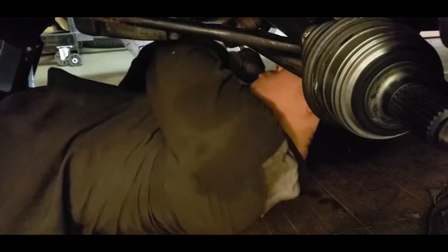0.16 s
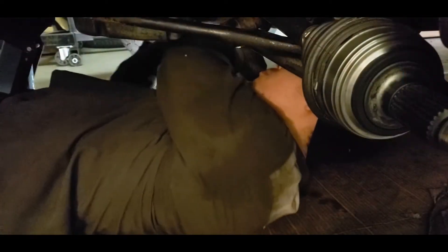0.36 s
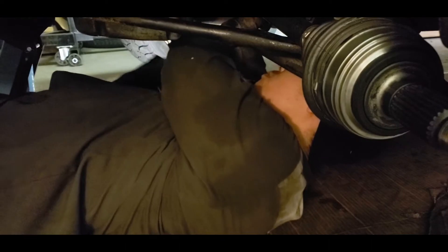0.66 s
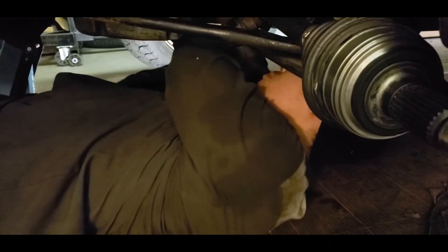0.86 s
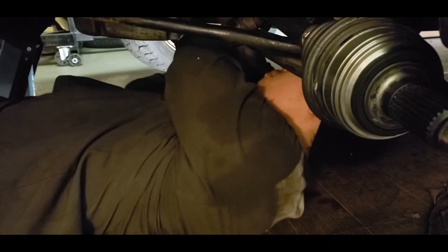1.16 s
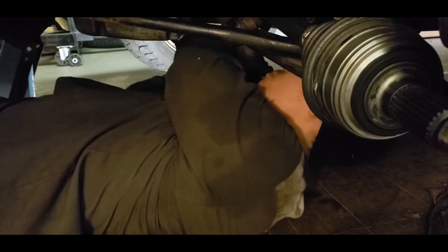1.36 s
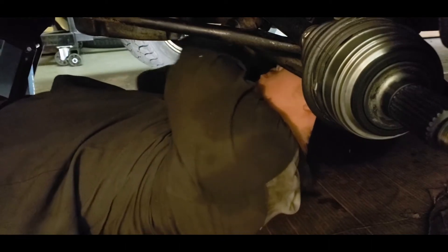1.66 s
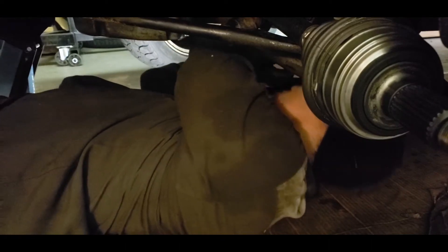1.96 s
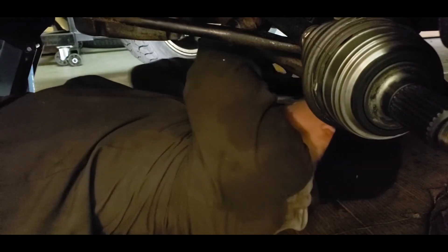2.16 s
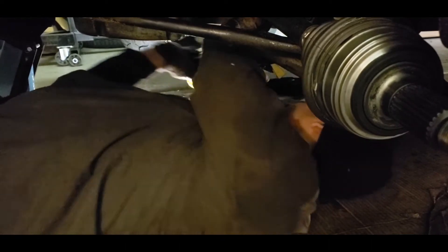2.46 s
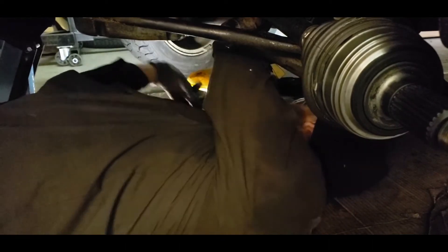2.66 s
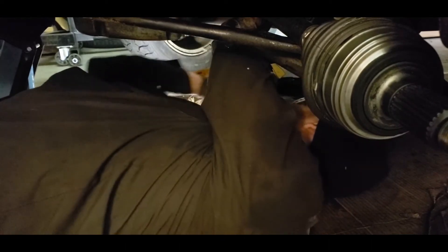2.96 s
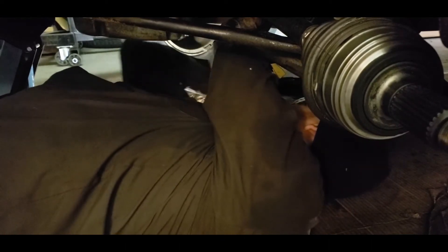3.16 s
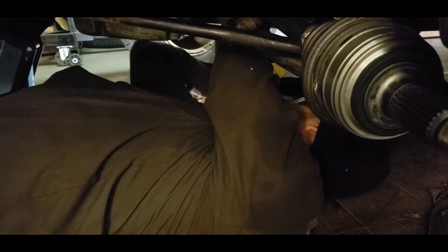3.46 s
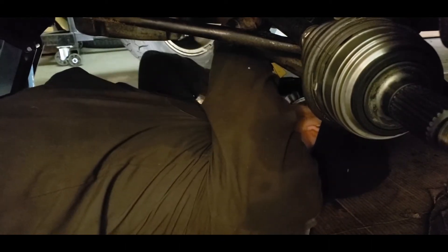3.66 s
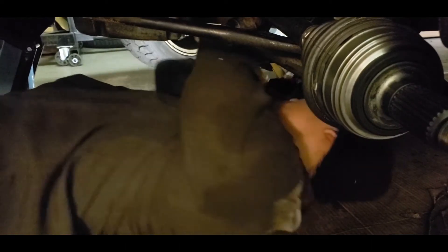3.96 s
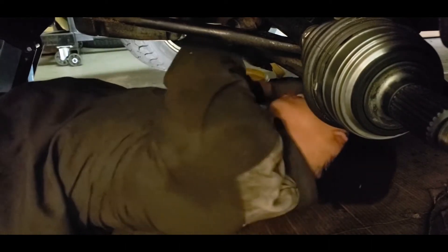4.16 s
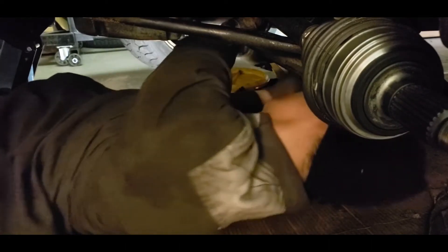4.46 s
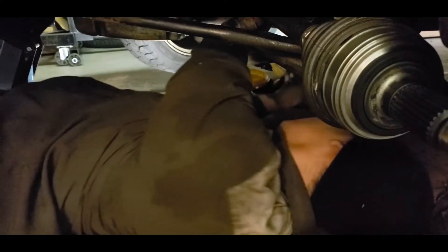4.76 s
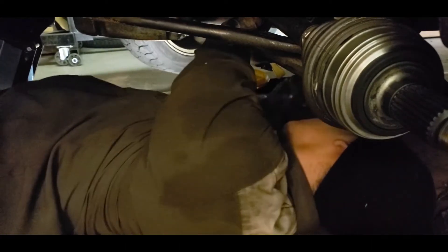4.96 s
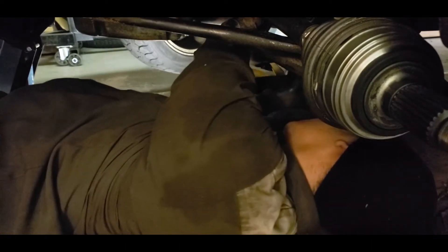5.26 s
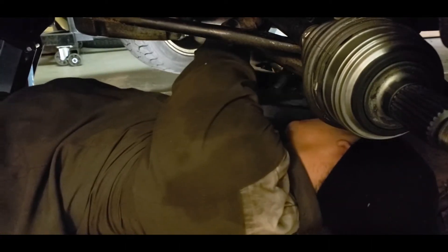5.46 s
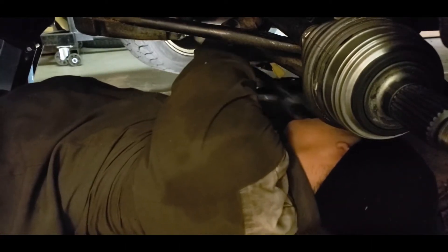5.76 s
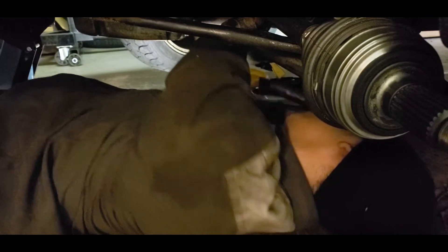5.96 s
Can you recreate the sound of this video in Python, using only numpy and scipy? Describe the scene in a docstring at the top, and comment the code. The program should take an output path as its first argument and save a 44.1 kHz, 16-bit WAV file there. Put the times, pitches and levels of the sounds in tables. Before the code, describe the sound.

A nearby stereo microphone hears a person working on the floor beneath a car. The first few seconds are very quiet: cloth movement, tiny knocks, faint low hum. Then come a grinding drag of a heavy object, a pair of knocks and a quickly damped clank of steel on steel. Rustling and hollow sleeve scuffs lead to low thumps and two loud, woody knocks, then a last cluster, with diffuse concrete garage reverberation.

```python
"""Working under a car

Someone lies under a car in a concrete garage, a stereo microphone nearby, using a hammer and steel wedge.
Knocks ring the modes of the floor board, steel clanks on steel and a heavy thing is dragged in dense slips;
sleeves scuff and rustle close by as swelling coloured noise.
The underside scatters the treble, the garage adds a half-second noise tail, and hum and hiss lie faintly below.
"""
import sys
import numpy as np
from scipy import signal
from scipy.io import wavfile

SR = 44100
rng = np.random.default_rng(int(sys.argv[2]) if len(sys.argv) > 2 else 0)


def transcribe(u):
    """Save the signal u as a 16-bit wav file named by the first command-line argument.

    u: samples, shape (n,) or (channels, n), limited to [-1, 1]; the rate is SR.
    q: integer samples, one column per channel.
    """
    v = np.clip(np.atleast_2d(u).T, -1, 1)
    q = np.round(v * 32767).astype(np.int16)
    wavfile.write(sys.argv[1], SR, q)


N = 269451

# Knocks on the board: start_s, push_db, loudest_pitch_hz, fall_below_db_per_octave,
# fall_above_db_per_octave, left_minus_right_db, rattle_decay_ms (to 1/e), rattle_db (beside the click)
KNOCKS = [(0.286, -44, 2190, 12, 16, 9, 3, -16), (0.452, -30.5, 1070, 8, 7.5, 3, 18, -0.5),
          (0.478, -39.5, 505, 3.5, 11, 1.5, 31, 7.5), (0.748, -35, 465, 1.5, 34, -1, 48, 3.5),
          (2.788, -34, 650, 12, 23, -4, 21, 4), (2.818, -24, 1030, 3, 5, 4, 20, -7.5),
          (2.847, -34.5, 1340, 5, 50, 0, 11, 12.7), (3.561, -17, 665, 2.5, 9, 0.5, 6.7, 0),
          (3.865, -17, 520, 4.5, -2, 1.1, 6.7, -2.5), (4.620, -12.5, 221, 1, 3, -3, 12, -1),
          (4.658, -13.5, 75, 7, 7.5, -2, 32, -9), (4.753, -16, 845, 5.5, 11.5, 1.5, 14, -2.5),
          (5.142, -32, 700, 9, 18, 3.5, 40, 3.5), (5.186, -3.5, 517, 4, 12, 0.5, 5.7, -6.5),
          (5.257, -17, 246, 4, 5, -6, 18, -0.5), (5.366, -3.5, 363, 6, 6, 0, 10, -7.5),
          (5.409, -17.5, 328, 19, 5.5, 0, 17, -1.5), (5.834, -17.5, 550, 7.5, 10.5, 1, 9.1, 1),
          (5.846, -6.5, 780, 18.5, 15.5, 3, 5.6, -14), (5.882, -20.5, 738, 6, 10.5, 7, 9, 1.5)]
# Modes of board and car floor, before each spot's own shift: pitch_hz, level_db, t60_s (under a knock)
BOARD_MODES = [(63, 0, .3), (95, 0, .25), (148, 0, .2), (210, -2, .15), (256, -3, .1), (291, -2.5, .09),
               (342, -2.5, .09), (400, -5, .05), (465, -3, .05), (570, -3, .04), (660, -3, .03),
               (830, -1, .018), (1050, 0, .012), (1300, 1, .012), (1520, 0, .010), (1750, 2, .010),
               (2200, 2, .006), (2900, 3, .004), (4000, 3, .003), (5500, 2, .002)]
# Steel striking steel: start_s, strength_db
CLANKS = [(3.8548, -9.5), (3.8616, -17), (3.928, -36)]
# Modes of the hand-held wedge and hammer: pitch_hz, level_db, t60_s
STEEL_MODES = [(910, -20, 0.023), (1440, -24, 0.049), (1720, -1, 0.02), (1830, -9, 0.019),
               (1970, -5, 0.0092), (2720, -11.5, 0.031), (2716, 2, 0.0091), (2790, -15.5, 0.07),
               (2735, -12.5, 0.03), (3200, -18.5, .008), (4380, -10.5, 0.0079), (5780, -14.5, 0.04),
               (6200, -17, .005), (7500, -20, .005), (10060, -15.5, 0.0098), (11300, -20, 0.006),
               (12400, -26, 0.006), (14600, -24, .005)]
# Dragging and shifting weight on the board: full_level_s, rise_s, hold_s, fall_s, level_db,
# tilt_db_per_octave (about 200 Hz)
DRAGS = [(0.052, .1, .03, 0.12, -48, -15), (0.38, 0.043, 0.034, .06, -62.5, 8),
         (1.094, 0.036, 0.0081, 0.033, -64.5, 5), (1.03, .02, .02, .04, -70, 9.5),
         (1.32, 0.036, 0.027, 0.05, -70.5, -9), (1.577, 0.026, 0.03, 0.095, -64.5, -11),
         (1.75, 0.067, 0.021, 0.12, -68.5, -8), (2.0, 0.13, 0.18, 0.26, -69.5, -11),
         (2.368, 0.045, 0.006, 0.032, -60, 12), (2.504, 0.066, 0.026, 0.049, -64, -19),
         (2.736, 0.028, 0.018, 0.031, -59, -1), (3.279, .03, .2, 0.046, -27.5, -0.25),
         (3.597, 0.033, 0.011, 0.042, -27.5, -5.5), (3.673, 0.086, 0.21, 0.054, -30, -3),
         (3.98, .05, .18, 0.086, -44.5, -12), (4.256, 0.069, 0.014, .1, -53.5, -7.5),
         (5.956, .04, 0.029, 0.33, -49, 13)]
# Movements of arms and body: full_level_s, rise_s, hold_s, fall_s, rustle_db,
# top_octave_db (added to rustle_db), scuff_db
MOVES = [(0.0, .05, 0.08, 0.24, -46, -3.5, -56), (0.282, .004, 0.0043, 0.022, -56, -10, -82),
         (0.352, 0.033, 0.053, 0.15, -58.5, 5, -90), (0.446, 0.0057, 0.074, 0.1, -56, -33, -54.5),
         (0.853, .2, .25, 0.44, -71, -4.5, -89), (1.094, .05, 0.013, 0.12, -74.5, -4, -80),
         (1.732, .06, 0.013, 0.17, -73, -13, -78), (2.2, .15, 0.021, 0.45, -66, -0.5, -75),
         (2.353, .1, 0.014, 0.05, -75, -6, -111.5), (2.58, .2, 0.076, 0.16, -52, -7, -52.5),
         (2.822, .003, .01, 0.14, -53.5, -16, -66), (3.254, .03, 0.16, 0.069, -58, -1.5, -70.5),
         (3.502, .1, 0.11, 0.1, -49.5, -10, -52), (3.85, .15, .03, 0.034, -45, 1, -42.5),
         (3.906, .02, .01, 0.24, -41.5, -10, -46.5), (4.136, .2, 0.026, 0.099, -43, -11.5, -48),
         (4.262, 0.053, 0.13, .1, -54, -7.5, -87), (4.41, 0.014, 0.011, 0.16, -47.5, -6, -54),
         (4.526, .12, 0.03, .08, -43.5, -7, -40.5), (4.625, .003, .005, 0.051, -48, 11.5, -60.5),
         (4.658, .05, 0.01, 1, -55, -1, -62.5), (4.976, 0.079, 0.018, 0.036, -98, 6, -80.5),
         (5.154, 0.0102, 0.022, 0.062, -68, -8, -73), (5.181, 0.0028, 0.053, .17, -45.5, -15, -51),
         (5.364, .003, 0.064, 0.16, -59.5, -4, -44.5), (5.541, 0.062, 0.0058, 0.053, -61, -2.5, -58),
         (5.631, .03, 0.0052, 0.026, -66, 2.5, -61), (5.841, 0.0072, 0.13, 0.14, -49.5, 0.5, -52.5),
         (5.92, .04, .02, 0.049, -46.5, -10, -51), (6.028, 0.11, 0.012, 0.19, -40, 0.5, -52)]
# Colour of a sleeve scuffing the floor: pitch_hz, relative_level_db_per_hz
SCUFF_COLOUR = [(180, -37), (300, -22.5), (438, -24.5), (587, -6), (684, -9), (840, -7), (916, -17),
                (2020, -20.5), (4000, -36.5), (5200, -41), (8800, -120)]
# Hollow note of the scuffing sleeve: pitch_hz, level_db, t60_s
SLEEVE_NOTE = (528, -7, 0.012)
# Colour of rustling clothes: pitch_hz, relative_level_db_per_hz
RUSTLE_COLOUR = [(530, -31.5), (900, -7), (1390, -8.5), (2020, -7.5), (3510, -7.5), (3860, -8.5),
                 (7060, -8.5), (8350, -7.5), (11300, -9), (12100, -2), (15100, -5), (16000, -0.5)]
# Colour of the hum and hiss: pitch_hz, relative_level_db_per_hz
HUM_COLOUR = [(15, -35), (25, -4.5), (70, 10.5), (87, 1.5), (256, -21), (476, -12), (607, -16),
              (4250, -37.5), (5140, -51), (6920, -41.5), (8360, -42.5), (11900, -22), (16000, -20.5)]
# Left-right likeness of every noise: pitch_hz, correlation (no unit)
LIKENESS = [(50, 0.7), (300, 0.88), (700, 0.091), (2000, 0.13), (12000, 0.059)]
# Decay of the garage: pitch_hz, t60_s
GARAGE_DECAY = [(60, 0.46), (250, 0.47), (1000, 0.49), (3000, 0.59), (8000, 0.67), (15000, 0.71)]
# Treble colour of the microphone: pitch_hz, width_hz, level_db
MIC_COLOUR = [(6920, 570, 4.5), (8850, 4300, -6), (11900, 870, 2.5)]

CONTACT_S = .00003   # a longer contact is duller
BOARD_DB = -8   # how well the board turns a push into sound
SPOT_SPREAD, SPOT_FROM_HZ = 0.076, 280   # each spot struck shifts the modes above by about this share
SWELL_DB = 20   # a rise or fall time covers this much level
RISE_BEND = 1.6   # a movement starts abruptly and eases into full level
TOP_OCTAVE_HZ, STILL_RUSTLE_DB = 9000, -81.5   # cloth never quite rests
HUM_DB = -71.5
UNDERSIDE_S, UNDERSIDE_HZ = 0.0087, 833   # scatter decay to 1/e, lowest scattered pitch
STRAIGHT_DB = -4   # unscattered part of the treble
LEFT_LEAD_S = .00008   # sound from the board and steel reaches the left side first
GARAGE_DB, CLANK_ROOM_DB = -4.5, -2.5   # the steel is struck close by, under the car
MIC_LOW_HZ, CUTOFF_HZ = 46.6, 15800


def knock_push(rattle_ms, rattle_db):
    """A click sets loose parts rattling; the finite contact time softens both."""
    t = np.arange(SR // 2) / SR
    rattle = rng.standard_normal(len(t)) * np.exp(-1000 * t / max(rattle_ms, 1))
    push = from_db(rattle_db) * rms_one(rattle) / np.sqrt(len(t))   # energy 1 at 0 dB, like the click
    push[0] = 1
    soft = np.exp(-1 / (CONTACT_S * SR))
    return signal.lfilter([(1 - soft) ** 2], [1, -2 * soft, soft ** 2], push)


def knocks():
    """Each knock pushes all board modes, weighted by its colour; gives the close sound and the garage feed."""
    near, sent = np.zeros((2, N + SR)), np.zeros(N + SR)
    for start_s, push_db, top_hz, below, above, pan_db, rattle_ms, rattle_db in KNOCKS:
        push = knock_push(rattle_ms, rattle_db)
        chance_db = rng.normal(0, 2.13, len(BOARD_MODES))
        moved = rng.normal(0, 1, len(BOARD_MODES))
        sound = 0
        for k, (hz, level_db, t60) in enumerate(BOARD_MODES):
            octaves = np.log2(hz / top_hz)
            colour_db = push_db + below * min(octaves, 0) - above * max(octaves, 0)
            pitch = hz * (1 + SPOT_SPREAD * moved[k] * (hz > SPOT_FROM_HZ))
            swing = (-1) ** (k // 3)   # parts swing opposite ways
            gain = swing * from_db(colour_db + level_db + BOARD_DB + chance_db[k])
            sound = sound + gain * ring(push, pitch, t60)
        place = slice(round(start_s * SR), round(start_s * SR) + len(sound))
        near[:, place] += underside(sound) * from_db(np.array([[.5], [-.5]]) * pan_db)
        sent[place] += sound
    return near[:, :N], sent[:N]


def clanks():
    """Hard contact rings the steel modes, damped fast by the hands."""
    rows = np.array(CLANKS)
    clicks = np.zeros(N)
    clicks[np.round(rows[:, 0] * SR).astype(int)] = from_db(rows[:, 1])
    return sum(from_db(level_db) * ring(clicks, hz, t60) for hz, level_db, t60 in STEEL_MODES)


def drag():
    """Dense slips on the rough floor shake the board, its low modes most."""
    rows = np.array(DRAGS)
    gains = from_db(swells(DRAGS) + rows[:, [4]]) + 1e-9
    level = full_rate(gains.sum(axis=0))
    tilt = full_rate(rows[:, 5] @ gains / gains.sum(axis=0))   # the louder drag decides the colour
    slips = (rng.random(N) < 900 / SR) * rng.standard_normal(N)   # about 900 a second
    shaken, power = 0, 0
    for k, (hz, _, t60) in enumerate(BOARD_MODES):
        treble_loss_db = 10.5 * np.log2(max(hz / 480, 1))
        bass_loss_db = 4.3 * np.log2(max(130 / hz, 1))
        share = from_db(tilt * np.log2(hz / 200) - treble_loss_db - bass_loss_db)
        mode = rms_one(ring(slips, hz, 0.63 * t60))   # shorter than under a knock
        shaken = shaken + share * mode * (-1) ** k
        power = power + share ** 2
    return level * shaken / np.sqrt(power)


def cloth():
    """Each movement rustles the clothes and scuffs a hollow-sounding sleeve over the floor."""
    shape_db = swells(MOVES)
    rustle_db, top_db, scuff_db = np.array(MOVES).T[4:, :, None]
    note_hz, note_db, note_t60 = SLEEVE_NOTE
    scuff = hiss(SCUFF_COLOUR, 2.9, rate_hz=20.0)
    scuff = scuff + from_db(note_db) * rms_one(ring(scuff, note_hz, note_t60))
    scuff_gain = full_rate(from_db(shape_db + scuff_db).sum(axis=0))
    out = scuff_gain * scuff * from_db([[-.8], [.8]])
    rustle = hiss(RUSTLE_COLOUR, 1.8, rate_hz=28.0)
    for kind, db, pan_db in (("low", rustle_db, .3), ("high", rustle_db + top_db, -1.5)):
        part = signal.sosfilt(signal.butter(4, TOP_OCTAVE_HZ, kind, fs=SR, output="sos"), rustle)
        gain = full_rate(from_db(shape_db + db).sum(axis=0)) + from_db(STILL_RUSTLE_DB)
        out += gain * part * from_db([[pan_db], [-pan_db]])
    return out


def hum_and_hiss():
    """Steady coloured noise, strongest in the bass, with slowly wandering bands."""
    return from_db(HUM_DB) * hiss(HUM_COLOUR, 1.2, rate_hz=1.4)


def underside(x):
    """The car's underside scatters the treble for some ms, differently to each side and each time."""
    t, n = np.arange(SR // 25) / SR, np.arange(len(x))
    echoes = rng.standard_normal((2, len(t))) * np.exp(-t / UNDERSIDE_S)
    echoes /= np.sqrt(np.sum(echoes ** 2, axis=1, keepdims=True))
    echoes[:, 0] = from_db(STRAIGHT_DB)
    low = signal.sosfilt(signal.butter(2, UNDERSIDE_HZ, "low", fs=SR, output="sos"), x)
    high = signal.sosfilt(signal.butter(2, UNDERSIDE_HZ, "high", fs=SR, output="sos"), x)
    out = low + signal.fftconvolve(high[None], echoes, axes=1)[:, :len(x)]
    out[1] = np.interp(n - LEFT_LEAD_S * SR, n, out[1])   # the right side hears it later
    return out


def garage(sent):
    """Diffuse tail of the concrete room: noise that builds in some ms and dies band by band."""
    t = np.arange(SR) / SR

    def decay(hz):
        """Fall by 60 dB in t60, with equal energy whatever the t60."""
        t60 = at_hz(GARAGE_DECAY, hz)
        return from_db(-60 * t / t60) / np.sqrt(t60)

    tail = bands(SR, decay)
    tail *= 1 - np.exp(-(t / 0.016) ** 2)
    tail /= np.sqrt(np.sum(tail ** 2) / 2)
    return from_db(GARAGE_DB) * signal.fftconvolve(sent[None], tail, axes=1)[:, :N]


def hiss(colour, patchy_db, rate_hz):
    """Coloured noise of rms 1 whose bands flicker, partly together."""
    together = drift(rate_hz)

    def flicker(hz):
        """Gain of one band over time."""
        return from_db(at_hz(colour, hz) + patchy_db * (0.18 * together + drift(rate_hz)))

    return rms_one(bands(N, flicker))


def bands(length, shape):
    """Half-octave bands of stereo noise with their own likeness, each times shape(hz)."""
    out, edges = 0, 25 * 2 ** np.arange(0, 9.6, .5)
    white = rng.standard_normal((2, 2, length))   # neighbouring bands get unrelated noise
    for k, (low, high) in enumerate(zip(edges, edges[1:])):
        band = signal.butter(2, [low, high], "band", fs=SR, output="sos")
        mid, side = signal.sosfilt(band, white[k % 2])
        hz = np.sqrt(low * high)
        alike = np.clip(at_hz(LIKENESS, hz), -1, 1)
        stereo = np.sqrt(1 + alike) * mid + np.sqrt(1 - alike) * side * [[1], [-1]]
        out = out + shape(hz) * stereo
    return out


def ring(push, hz, t60):
    """A damped resonator: a unit click sets a sine of height 1 ringing."""
    r, w = from_db(-60 / (max(t60, .001) * SR)), 2 * np.pi * hz / SR
    return signal.lfilter([0, np.sin(w)], [1, -2 * r * np.cos(w), r * r], push + 1e-18)


def swells(rows):
    """One curve in dB per row, every 32nd sample: rise to 0 dB, hold, fall."""
    start, rise, hold, fall = np.array(rows)[:, :4, None].transpose(1, 0, 2)
    t = np.arange(0, N + 32, 32) / SR - start
    before = (np.maximum(-t, 0) / rise) ** RISE_BEND
    after = np.maximum(t - hold, 0) / fall
    return -SWELL_DB * (before + after)


def full_rate(slow):
    """Every sample from every 32nd."""
    return np.interp(np.arange(N) / 32, np.arange(len(slow)), slow)


def drift(rate_hz):
    """Slow chance of spread 1: noise smoothed twice above rate_hz, made at every 40th sample."""
    r = np.exp(-2 * np.pi * rate_hz * 40 / SR)
    noise = rng.standard_normal(N // 40 + 2002)
    slow = signal.lfilter([1], [1, -2 * r, r * r], noise)[2000:]   # skip the settling
    return np.interp(np.arange(N) / 40, np.arange(len(slow)), rms_one(slow))


def at_hz(points, hz):
    """Read a table on a log-frequency axis."""
    return np.interp(np.log(hz), np.log(np.array(points)[:, 0]), np.array(points)[:, 1])


def rms_one(x):
    """Scaled to rms 1."""
    return x / np.sqrt(np.mean(x ** 2) + 1e-20)


def from_db(db):
    """Gain of a level in dB."""
    return 10 ** (np.asarray(db) / 20)


def scene():
    """Knocks, steel and drag sound through the garage; cloth is close; the hum lies under all."""
    (near, sent), steel, dragged = knocks(), clanks(), drag()
    close = near + underside(dragged) + underside(steel) * from_db([[.8], [-.8]])
    room = garage(sent + dragged + from_db(CLANK_ROOM_DB) * steel)
    return close + room + cloth() + hum_and_hiss()


def record(dry):
    """The microphone drops the deepest bass and colours the treble; the top is cut steeply."""
    heard = signal.sosfilt(signal.butter(3, MIC_LOW_HZ, "high", fs=SR, output="sos"), dry)
    for hz, width, db in MIC_COLOUR:
        peak = signal.lfilter(*signal.iirpeak(hz, hz / width, fs=SR), heard)
        heard = heard + (from_db(db) - 1) * peak
    # the stopband, 60 dB down, begins just above the cutoff
    return signal.sosfilt(signal.cheby2(14, 60, CUTOFF_HZ + 250, fs=SR, output="sos"), heard)


dry = scene()
out = record(dry)
transcribe(out)
```